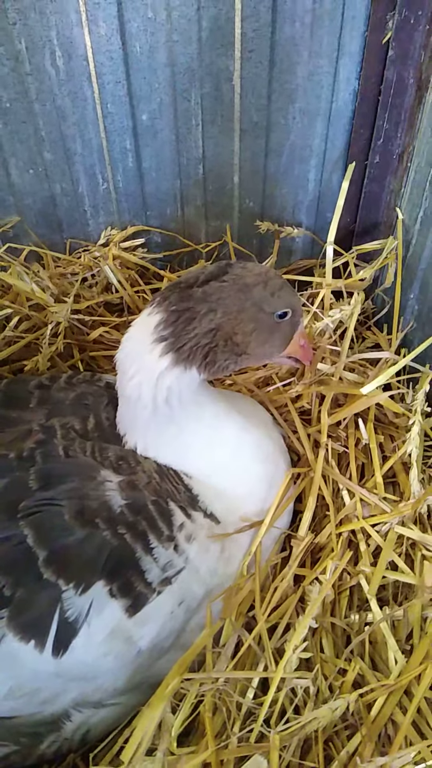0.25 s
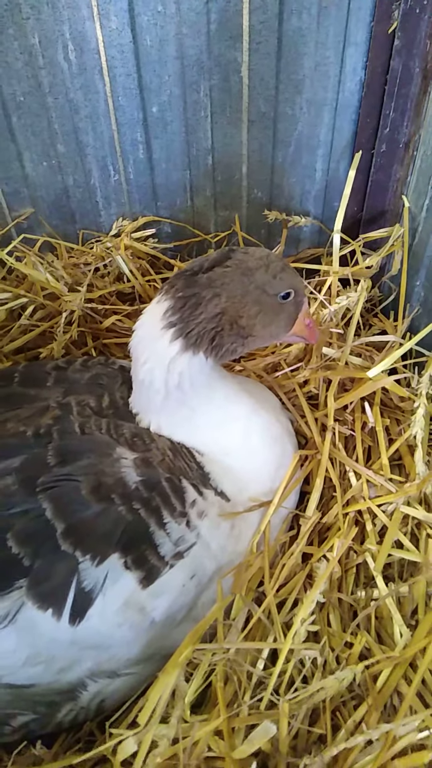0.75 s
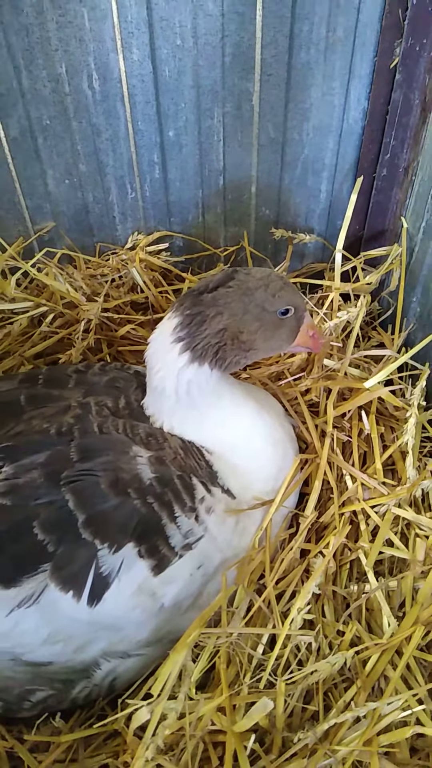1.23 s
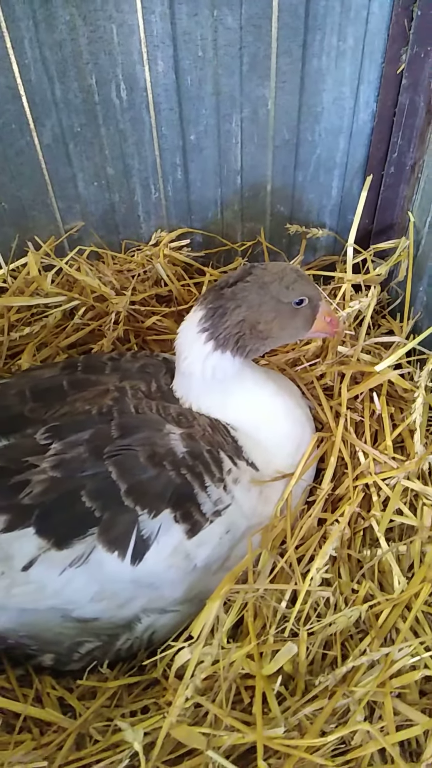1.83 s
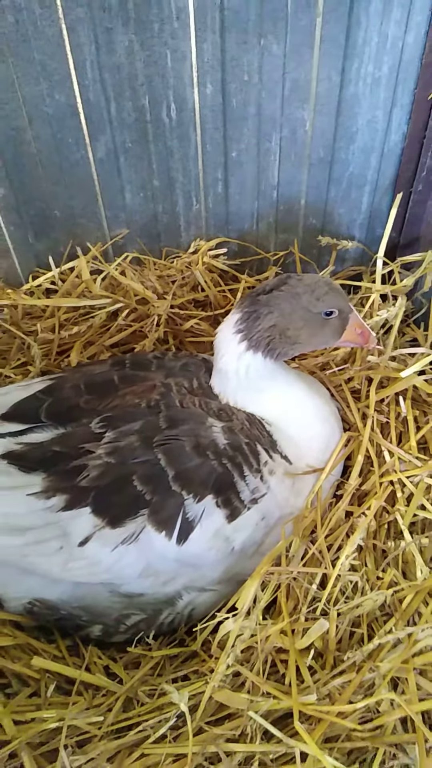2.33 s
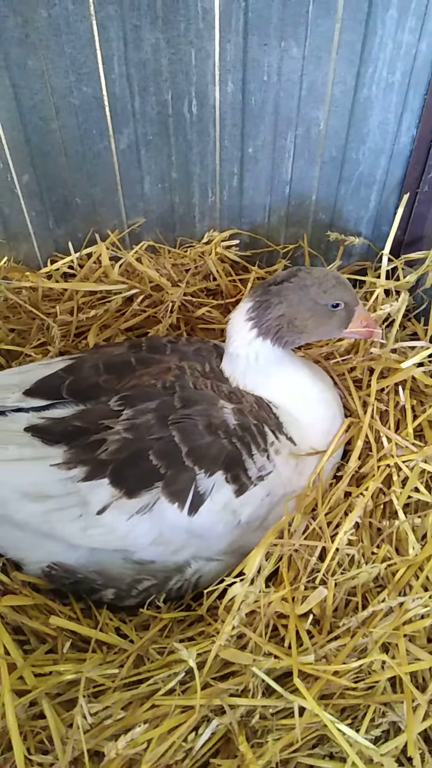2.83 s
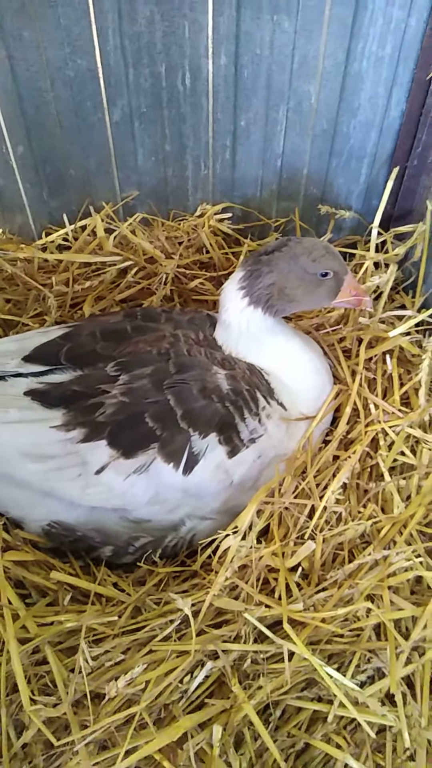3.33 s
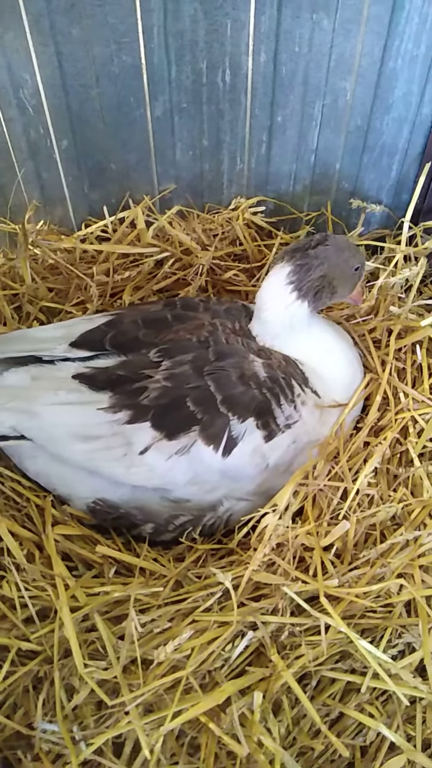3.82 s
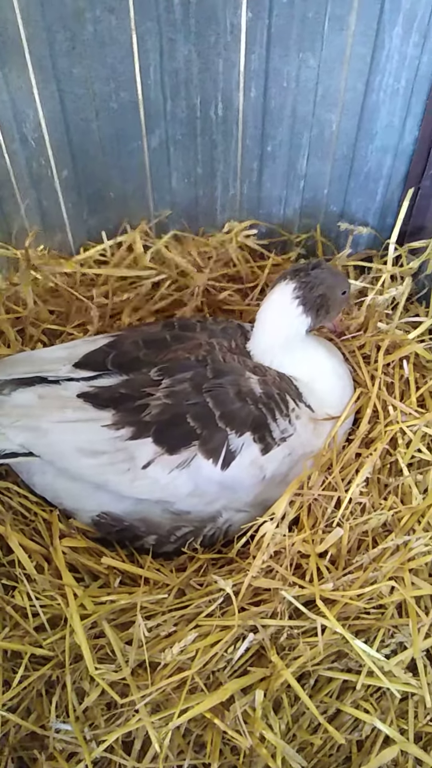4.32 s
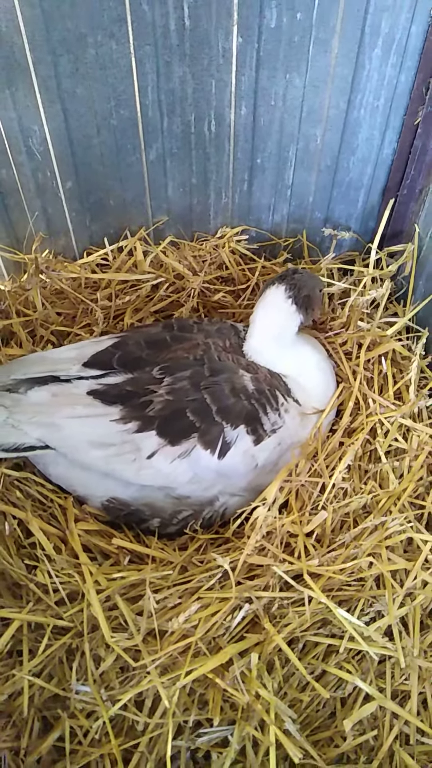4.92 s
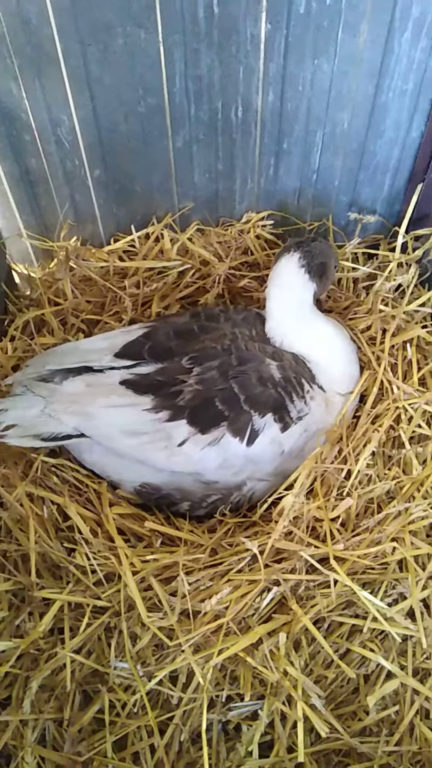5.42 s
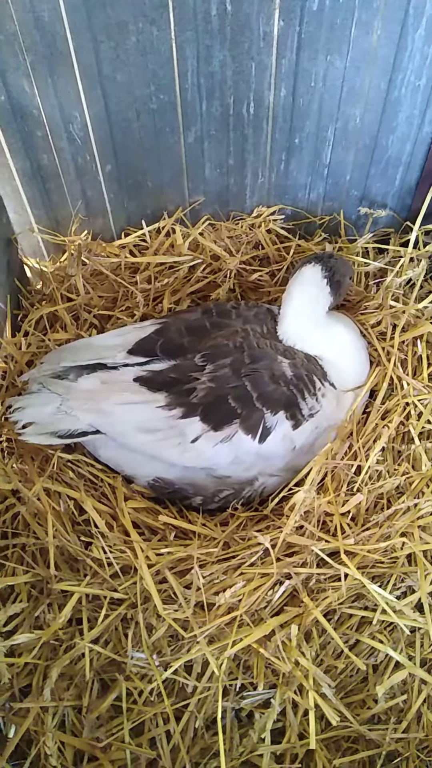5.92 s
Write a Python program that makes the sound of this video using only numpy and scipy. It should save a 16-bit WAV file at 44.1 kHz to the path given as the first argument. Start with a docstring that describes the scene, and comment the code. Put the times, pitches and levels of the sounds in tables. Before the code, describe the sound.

After a brief hoarse crow, quiet clucks and slow steps on straw lead to two breathy goose whistles in a shed.

```python
"""A nesting goose in a metal shed

A goose on a straw nest gives two rising whistles, made in its throat and wrapped in a hiss of air.
A rooster ends a hoarse crow on two coupled membranes, another fowl calls from farther off, hens cluck,
a small bird chirps and something squawks. Straw rustles and snaps, and the floor thuds under slow steps.
The sheet-metal walls reverberate, and the yard returns a long tail of the crow and the far call."""
import sys
import numpy as np
from scipy import signal
from scipy.fft import rfft, irfft, next_fast_len
from scipy.io import wavfile

SR = 44100
rng = np.random.default_rng(int(sys.argv[2]) if len(sys.argv) > 2 else 0)


def waveform_to_disk(signal):
    """Save audio, clipped to [-1, 1], as 16-bit WAV at the path in sys.argv[1]."""
    frames = np.transpose(np.atleast_2d(signal))
    scaled = np.clip(frames, -1, 1) * 32767
    samples = np.round(scaled).astype(np.int16)
    wavfile.write(sys.argv[1], SR, samples)


N = 271634
TIME = np.arange(N) / SR


def amp(db):
    """Amplitude ratio of a level in decibels."""
    return 10 ** (np.asarray(db) / 20)


def unit(x):
    """Normalisation to rms 1."""
    return x / np.sqrt(np.mean(x ** 2) + 1e-20)


def value_at(points, hz):
    """Interpolation on a logarithmic frequency axis."""
    f, value = np.transpose(points)
    return np.interp(np.log(hz + 1), np.log(f + 1), value)


def colour(x, points):
    """Zero-phase filtering by a spectrum in dB, normalised to rms 1."""
    size = x.shape[-1]
    full = next_fast_len(size, True)
    gain = amp(value_at(points, np.fft.rfftfreq(full, 1 / SR)))
    return unit(irfft(rfft(x, full) * gain, full)[..., :size])


def wander(size, rate_hz):
    """Random fluctuation: low-pass noise of rms near 1."""
    full = next_fast_len(size + SR // 2, True)
    f = np.fft.rfftfreq(full, 1 / SR)
    return unit(irfft(rfft(rng.standard_normal(full)) / (1 + (f / rate_hz) ** 4), full))[:size]


def contours(rows):
    """Linear interpolation of breakpoints: the onset, then each column at every sample."""
    times, *columns = np.transpose(rows)
    t = np.arange(max(times[0], 0), times[-1], 1 / SR)
    return [t[0]] + [np.interp(t, times, column) for column in columns]


def phase_of(hz, jitter, rate_hz):
    """Phase as the integral of a randomly modulated frequency."""
    return 2 * np.pi * np.cumsum(hz * (1 + jitter * wander(len(hz), rate_hz))) / SR


def placed(onset, sound):
    """Time shift of a sound to its onset, with tapered ends."""
    faded = sound * signal.windows.tukey(len(sound), .04)
    return np.concatenate([np.zeros(max(round(onset * SR), 0)), faded, np.zeros(N)])[:N]


def pair(a, b, coherence, left_db):
    """Partial coherence: two independent noises mixed into left and right channels."""
    right = coherence * a + np.sqrt(1 - coherence ** 2) * b
    return np.array([a * amp(left_db / 2), right * amp(-left_db / 2)])


def swells(rows, attack_s, arch_db, release_s):
    """Incoherent addition: arched envelopes with exponential release sum in power."""
    power = np.zeros(N)
    for onset, length, db in rows:
        age = TIME - onset
        sag_db = arch_db * (2 * np.clip(age / length, 0, 1) - 1) ** 2
        attack = np.clip(age / attack_s, 0, 1) ** 2
        release = np.exp(-np.maximum(age - length, 0) / release_s)
        power += (amp(db - sag_db) * attack * release) ** 2
    return np.sqrt(power)


# Reverberation time of the shed: f/Hz, T60/s
SHED_T60 = [(150, 0.099), (500, 0.29), (1000, 0.19), (3000, 0.25), (8000, 0.052), (15000, 0.015)]


def shed(x, wet_db, left_db):
    """Reverberation: direct sound plus dense reflections from metal walls, different in each channel."""
    t = np.arange(SR // 2) / SR
    reflections = rng.standard_normal((2, len(t))) * (rng.random((2, len(t))) < .1) * (t > .002)
    hz, age, spectra = signal.stft(reflections, SR, nperseg=256)
    decay = amp(-60 * age / value_at(SHED_T60, hz)[:, None])
    tail = signal.istft(spectra * decay, SR, nperseg=256)[1]
    tail /= np.linalg.norm(tail, axis=1, keepdims=True)
    wet = signal.fftconvolve(x[None], tail, axes=1)[:, :N]
    return (x + amp(wet_db) * wet) / np.hypot(1, amp(wet_db)) * amp([[left_db / 2], [-left_db / 2]])


# Spectrum of the yard's reflections: f/Hz, relative level/dB
YARD_SPECTRUM = [(150, -51), (520, -9), (1050, 2), (1600, 9), (2200, 6.5), (3300, 6.5), (5000, -2),
                 (9000, -33)]


def yard(x, db, t60_s=1.3, build_s=0.095):
    """Late reflection: far walls return a thin tail that builds up, then decays exponentially."""
    t = np.arange(round(1.2 * SR)) / SR
    envelope = amp(-60 * t / t60_s) * np.clip(t / build_s, 0, 1) ** 2
    tail = colour(rng.standard_normal((2, len(t))), YARD_SPECTRUM) * envelope
    return amp(db) * signal.fftconvolve(x[None], tail / np.linalg.norm(tail[0]), axes=1)[:, :N]


# Spectrum of the ambient noise: f/Hz, relative level/dB
AIR_SPECTRUM = [(20, -35), (40, -2.5), (65, 6), (95, 2), (150, -8), (280, -12), (520, -17.5), (880, -11),
                (1300, -29), (2000, -28), (4000, -38.5), (8000, -42.5), (16000, -38)]


def air(level_db=-66.5):
    """Coherence falls with frequency: a rumble alike in both channels under the yard's diffuse wash."""
    common, other = colour(rng.standard_normal((2, N)), AIR_SPECTRUM)
    side = 0.45 * colour(other, [(120, -10.5), (500, -7), (1500, 6)])
    swell = amp(level_db + 1.8 * wander(N, rate_hz=13.0))
    return swell * np.array([common + side, common - side]) * amp([[1.5], [-1.5]])


# Steps and shifts of weight: t/s, duration/s, relative level/dB
FOOTFALLS = [(1.46, 0.074, -62.5), (2.6, 0.14, -57.5), (2.785, 0.058, -51.5), (3.01, 0.14, -54.5),
             (3.29, 0.068, -53), (3.545, 0.11, -50.5), (3.85, 0.19, -61.5)]
# Spectrum of a thud on the floor: f/Hz, relative level/dB
THUD_SPECTRUM = [(20, -50), (35, -33), (60, 4), (110, 0.5), (200, -9.5), (350, -15.5), (800, -14.5),
                 (1400, -20.5), (2500, -23.5), (5000, -38), (12000, -53)]


def steps(gain_db=-2):
    """Soft impact: weight settling on the bedding excites mainly low frequencies."""
    push = swells(FOOTFALLS, attack_s=0.0093, arch_db=1, release_s=0.053) * amp(gain_db)
    return pair(*colour(rng.standard_normal((2, N)), THUD_SPECTRUM), coherence=0.97, left_db=2.5) * push


# Spells of pressing and rubbing on straw: t/s, duration/s, relative level/dB
RUBS = [(0, 0.25, -69.5), (.305, 0.01, -50.5), (.735, 0.059, -71.5), (.95, 0.018, -69), (1.06, .13, -75),
        (1.33, 0.35, -70), (1.47, .05, -67.5), (1.7, .2, -82), (2.025, 0.022, -67), (2.545, 0.35, -69),
        (2.78, 0.079, -64.5), (2.945, 0.052, -65.5), (3.0, 0.19, -66.5), (3.25, 0.15, -67.5),
        (3.51, .21, -65.5), (3.85, 0.05, -69), (3.94, 0.25, -77.5), (4.44, 0.089, -74), (4.52, 0.065, -68),
        (4.61, 0.13, -66.5), (4.735, 0.088, -59.5), (4.822, 0.035, -58), (4.875, 0.052, -56),
        (4.93, 0.093, -67.5), (5.04, 0.6, -68), (5.62, .04, -71.5), (6.12, 0.068, -64.5)]
# Bright fizz of the straw: f/Hz, relative density level/dB
FIZZ_SPECTRUM = [(20, -23), (800, -23), (2000, -14.5), (3500, -12), (5500, -4.5), (8000, -5.5), (11000, 1),
                 (14000, 2), (16000, -1.5)]
# Body of the sound, from stalks bending and rubbing: f/Hz, relative density level/dB
STALK_SPECTRUM = [(20, -27), (100, 0.5), (250, 7), (500, 0), (1000, -1.5), (1500, -9.5), (2500, -10.5),
                  (4000, -10.5), (8000, -25.5), (16000, -24)]


def straw(fizz_db=-1.5, rest_db=-83, body_db=-75.5, body_slope=0.48,
          grains_per_s=900, cracks_per_s=110, crack_s=0.0032):
    """Friction noise: countless stalks rub and crackle; harder rubbing adds more fizz than body."""
    rub = np.hypot(swells(RUBS, attack_s=0.0084, arch_db=5, release_s=0.023), amp(rest_db))
    cracks = 0.48 * rng.random(N) * (rng.random(N) < cracks_per_s / SR)
    crackle = signal.lfilter([1], [1, -np.exp(-1 / (crack_s * SR))], cracks)
    rub_db = 20 * np.log10(rub * (1 + crackle)) + 2.47 * wander(N, rate_hz=24)
    grains = rng.standard_normal((2, N)) * (rng.random((2, N)) < grains_per_s / SR)
    drive = rng.standard_normal((2, N)) + 0.71 * unit(grains)
    fizz = pair(*colour(drive, FIZZ_SPECTRUM), coherence=0.072, left_db=4.5)
    body = pair(*colour(drive, STALK_SPECTRUM), coherence=0.38, left_db=1)
    return fizz * amp(rub_db + fizz_db) + body * amp(body_db + body_slope * (rub_db - np.median(rub_db)))


# Breaking stalks: t/s, relative peak level/dB
STALK_BREAKS = [(0.3916, -70), (0.5671, -70), (1.1448, -62), (1.8257, -64.5), (2.198, -62), (2.4663, -69),
                (3.131, -58), (3.8846, -61), (4.0025, -56), (4.843, -48), (4.9485, -50.5), (5.3065, -35.5),
                (5.4304, -38.5), (5.9893, -37)]
# Spectrum of a snap: f/Hz, relative density level/dB
SNAP_SPECTRUM = [(100, 15), (1000, -15), (3500, -33), (6000, 6.5), (8500, -1), (11500, 11), (16000, 10)]


def snaps(gain_db=-2, decay_s=0.0097):
    """Fracture transients: a stalk gives way in a bright burst that decays exponentially."""
    bursts = np.zeros(N)
    for onset, db in STALK_BREAKS:
        age = TIME - onset
        bursts += amp(db + gain_db) * np.exp(-abs(age) / decay_s) * (age > 0)
    return pair(*colour(rng.standard_normal((2, N)), SNAP_SPECTRUM), coherence=0.24, left_db=0.5) * bursts


# Chirps of the small bird: t/s, duration/s, top f/Hz, level/dB
BIRD_CHIRPS = [(0.203, .045, 5090, -64.5), (2.789, .05, 5350, -72), (3.018, .125, 4765, -62.5)]


def small_bird(octave_db=-14, bend_hz_per_s=4500, skew=0.71, flutter_db=4):
    """Frequency modulation: each fluttering chirp arches in pitch, a longer one bending further."""
    out = np.zeros(N)
    for onset, length, top_hz, db in BIRD_CHIRPS:
        progress = np.linspace(0, 1, round(length * SR))
        hz = top_hz - bend_hz_per_s * length * (1 - np.sin(np.pi * progress ** skew))
        phase = phase_of(hz, jitter=0.015, rate_hz=130)
        envelope = amp(db + flutter_db * wander(len(hz), rate_hz=39)) * np.sin(np.pi * progress)
        out += placed(onset, envelope * unit(np.sin(phase) + amp(octave_db) * np.sin(2 * phase)))
    return shed(out, wet_db=-1.5, left_db=6)


# Course of the squawk: t/s, f/Hz, level/dB
SQUAWK_CONTOUR = [(4.38, 668, -74), (4.395, 709, -68), (4.42, 720, -86), (4.45, 673, -87)]
# Throat response for the squawk: f/Hz, relative level/dB
SQUAWK_FORMANTS = [(700, -2), (1400, -8), (2100, 5), (2800, -23), (3500, 0.5), (4250, -9), (5300, -10),
                   (7000, -12)]


def squawk():
    """Source and filter: throat resonances shape a harmonic series into one short, reedy note."""
    onset, hz, db = contours(SQUAWK_CONTOUR)
    phase = phase_of(hz, jitter=0.033, rate_hz=510)
    reed = unit(sum(amp(value_at(SQUAWK_FORMANTS, k * hz)) * np.cos(k * phase) for k in range(1, 10)))
    return shed(placed(onset, amp(db) * reed), wet_db=10, left_db=5.5)


# Soft clucks: t/s, duration/s, top f/Hz, level/dB, second harmonic re first/dB
HEN_CLUCKS = [(0.603, 0.047, 634, -56.5, -31), (0.892, 0.027, 615, -59.5, -19),
              (1.151, 0.03, 584, -64.5, -15), (1.348, .095, 427.7, -65.5, 29),
              (1.509, 0.026, 444, -68.5, -3), (1.606, 0.099, 388, -68.5, 20),
              (1.787, 0.074, 442.6, -67.5, -2), (2.067, 0.061, 410, -59.5, -9), (2.22, 0.095, 424, -68, 12),
              (2.452, 0.1, 435, -65.5, 16), (2.651, 0.23, 467.5, -60.5, 6), (3.127, 0.056, 549, -67, -24),
              (3.19, 0.11, 422.6, -64.5, 8.5), (3.374, 0.052, 575, -63, -17), (3.438, 0.11, 426, -65.5, 11),
              (4.417, .06, 471, -64.5, -12), (4.552, 0.12, 476.5, -65, -23), (4.729, 0.067, 426.3, -61, -5),
              (4.869, 0.13, 418, -64, -10), (5.406, 0.09, 452.3, -58, 13), (5.634, 0.079, 430.4, -68.5, 4),
              (5.888, 0.046, 432.3, -64.5, 10), (6.1, 0.035, 442, -61.5, 8.5)]
# Breath noise of a cluck: f/Hz, relative level/dB
HUSK_SPECTRUM = [(200, -26), (420, -6.5), (560, -5.5), (720, 4), (900, -1.5), (1150, -17), (1900, -8),
                 (2500, -9.5), (3200, -36), (8000, -46)]


def hens(third_db=-19, pitch_arch=0.0487, husk_db=-7, husk_slope=0.42, skew=0.72):
    """Joint modulation: pitch and loudness rise and fall with effort; brighter notes are huskier."""
    out = np.zeros(N)
    for onset, length, hz, db, second_db in HEN_CLUCKS:
        progress = np.linspace(0, 1, round(length * SR))
        effort = np.sin(np.pi * progress ** skew).clip(0)
        phase = phase_of(hz * (1 - pitch_arch * (1 - effort)), jitter=.04, rate_hz=110)
        overtones = np.sin(2 * phase) + amp(third_db) * np.sin(3 * phase)
        note = unit(np.sin(phase) + amp(second_db) * overtones)
        breath = rng.standard_normal(len(phase)) * (1 + np.sin(phase))
        husk = amp(husk_db + husk_slope * min(second_db, 0)) * colour(breath, HUSK_SPECTRUM)
        out += placed(onset, amp(db) * (note + husk) * np.sqrt(effort))
    return shed(out, wet_db=-4, left_db=2.5)


# Course of the far call: t/s, f/Hz, relative level/dB, spectral tilt/(dB per octave)
FAR_CONTOUR = [(3.62, 560.7, -61, -12), (3.69, 596, -53.5, -5), (3.77, 622.6, -57, -1.5),
               (3.84, 608.6, -52, 0), (3.94, 547.4, -55.5, 4.5), (4.05, 531, -57.5, 2),
               (4.11, 523, -66, -4)]
# Throat response of the far fowl: f/Hz, relative level/dB
FAR_FORMANTS = [(200, -43), (420, -3.5), (560, 7), (750, -12), (1100, 0.5), (1350, -19), (1600, -5),
                (2100, -7), (2700, -21.5), (3800, -21), (4800, -26), (6500, -30), (10000, -30.5),
                (16000, -58)]
# Resonances of the far coop: f/Hz, nominal bandwidth/Hz, relative level/dB
COOP_MODES = [(745.4, 17, -11.5), (976, 84, -13.5), (1130, 160, -10.5), (1554, 26, -12.5), (1784, 85, -20),
              (2010, 62, -20.5), (2671, 37, -20.5), (3030, 50, -31), (4740, 35, -32)]


def far_fowl(tone_db=-5, rasp_db=-10, rings_db=-1):
    """Forced resonance: a hoarse, falling call brightens as the beak opens; its rasp rings the coop."""
    onset, hz, level_db, tilt_db = contours(FAR_CONTOUR)
    phase = phase_of(hz, jitter=.013, rate_hz=100)
    gains = np.array([amp(value_at(FAR_FORMANTS, k * hz) + tilt_db * np.log2(k)) for k in range(1, 19)])
    gains /= np.linalg.norm(gains, axis=0)
    tone = sum(gain * np.cos(k * phase) for k, gain in enumerate(gains, 1))
    rasp = colour(rng.standard_normal(len(hz)), FAR_FORMANTS)
    voice = amp(tone_db) * unit(tone) + amp(tilt_db / 2 + rasp_db) * rasp
    for mode_hz, width_hz, db in COOP_MODES:
        resonator = signal.iirpeak(mode_hz, mode_hz / width_hz / 2, fs=SR)
        ring = unit(signal.lfilter(*resonator, signal.lfilter(*resonator, rasp)))
        voice += ring * amp(db + rings_db + tilt_db * np.log2(mode_hz / hz))
    call = placed(onset, amp(level_db) * voice)
    return shed(call, wet_db=-2.0, left_db=2.5) + yard(call, db=-16.5)


# End of the crow: t/s, voice f/Hz, relative voice level/dB, growl f/Hz, growl level/dB
CROW_CONTOUR = [(0, 550.4, -38.5, 192, -35.5), (.03, 531.4, -42, 200.7, -59), (.07, 566.4, -41.5, 199, -40),
                (.11, 565.2, -45, 180.6, -65), (.138, 572.5, -40.5, 191, -40.5), (.2, 558, -40, 180, -45),
                (.24, 545.8, -39, 183.5, -38), (.285, 512, -44.5, 133.5, -44), (.34, 498.4, -74, 156, -63)]
# Response of the rooster's throat to the harmonics: f/Hz, relative level/dB
CROW_FORMANTS = [(560, 4.5), (1120, -1.5), (1690, -18), (2250, -16.5), (2800, -25.5), (3350, -26),
                 (4000, -36), (4600, -31), (5100, -29), (6200, -32), (8000, -56)]
# Its response to the rasp: f/Hz, relative level/dB
RASP_SPECTRUM = [(100, -2.5), (400, -10), (660, 2.5), (950, -2.5), (1220, 0.5), (1500, -17.5), (1850, -5),
                 (2650, -20.5), (3600, -25.5), (4300, -38), (5100, -28), (6300, -30), (7500, -38),
                 (16000, -40)]


def rooster(tone_db=3, rasp_db=-5, rasp_rise_db_per_s=16, carry_s=0.26):
    """Amplitude modulation: a slow membrane growls and shakes a fast one, which chops air into a rasp."""
    onset, hz, level_db, slow_hz, growl_db = contours(CROW_CONTOUR)
    tiring_db = rasp_rise_db_per_s * np.arange(len(hz)) / SR  # the rasp grows as the crow tires
    phase = phase_of(hz, jitter=.006, rate_hz=90)
    # Dispersion: the throat spreads each pulse in time, hence the phase offsets k * k.
    tone = sum(amp(value_at(CROW_FORMANTS, k * hz)) * np.cos(k * phase + k * k) for k in range(1, 14))
    slow_membrane = np.cos(phase_of(slow_hz, jitter=.08, rate_hz=90))
    shake = placed(onset, slow_membrane)
    rasp = colour(rng.standard_normal(len(hz)) * (1 + np.cos(phase)), RASP_SPECTRUM)
    voice = placed(onset, amp(level_db + tone_db) * unit(tone)) * (1 + 0.07 * shake)
    hoarse = placed(onset, amp(level_db + rasp_db + tiring_db) * rasp) * (1 + 0.06 * shake)
    growl = placed(onset, amp(growl_db) * unit(slow_membrane))
    # The falling end carries farthest.
    carried = voice * amp(np.interp(TIME, [carry_s - .03, carry_s + 0.037], [-15, 4]))
    near = shed(voice + growl, wet_db=-17, left_db=4)
    return near + shed(hoarse, wet_db=-6.5, left_db=0.5) + yard(carried, db=-9.5)


# Whistles: t/s, duration/s, relative tone level/dB, tilt/(dB per harmonic), hiss level/dB
GOOSE_CALLS = [(5.239, 0.28, -44.5, -6, -51.5), (5.793, 0.27, -48, -1, -50.5)]
# Response of the goose's throat: f/Hz, relative level/dB
GOOSE_FORMANTS = [(1100, -7), (1780, -9), (1860, -1), (2400, -1.5), (3590, -7.5), (3730, 3), (4200, 5.5),
                  (5100, -1.5), (5480, 5.5), (5640, -3.5), (6850, 2), (7200, -14), (7480, -36),
                  (11000, -18), (13000, -18)]


def goose_whistle(start_hz=1095, knee_hz=1712, top_hz=1861, knee_s=0.057, top_s=.168,
                  attack_s=0.079, swell_db=16.5, fade_from_s=0.17, fade_db_per_s=247, wheeze=0.183):
    """Flow-driven oscillation in the throat: jitter smears the tone as it leaps; it clears at the top."""
    out = np.zeros(N)
    for onset, length, db, tilt_db, _ in GOOSE_CALLS:
        t = np.arange(0, length, 1 / SR)
        hz = np.interp(t, [0, knee_s, top_s], [start_hz, knee_hz, top_hz])
        jitter = .007 + wheeze * np.clip(1 - hz / knee_hz, 0, 1)
        phase = phase_of(hz, jitter, rate_hz=284)
        tone = sum(amp(value_at(GOOSE_FORMANTS, k * hz) + tilt_db * (k - 1)) * np.sin(k * phase)
                   for k in range(1, 8))
        rise_db = swell_db * np.minimum(t / attack_s - 1, 0)
        fade_db = fade_db_per_s * np.maximum(t - fade_from_s, 0)
        flutter_db = 2.5 * wander(len(t), rate_hz=116)
        out += placed(onset, np.sqrt(2) * amp(db + rise_db - fade_db + flutter_db) * tone)
    return shed(out, wet_db=-11, left_db=3)


# Air rushing out with a whistle: f/Hz, relative density level/dB
HISS_SPECTRUM = [(30, -12), (250, -2.5), (1000, -0.5), (1600, -10.5), (4000, -8.5), (8000, -7.5),
                 (11000, -1), (16000, 0.5)]


def goose_hiss(lead_s=0.039, stretch=1.096, flutter_db=1.5):
    """Flow noise: air starts to hiss just before each whistle and flows all through it."""
    breaths = [(onset - lead_s, stretch * length, db) for onset, length, _, _, db in GOOSE_CALLS]
    flow = swells(breaths, attack_s=0.079, arch_db=5, release_s=0.017)
    hiss = pair(*colour(rng.standard_normal((2, N)), HISS_SPECTRUM), coherence=0.25, left_db=4.0)
    return hiss * flow * amp(flutter_db * wander(N, rate_hz=60))


def scene():
    """Superposition of the birds, the straw, the steps and the ambient noise."""
    birds = rooster() + far_fowl() + squawk() + hens() + small_bird() + goose_whistle() + goose_hiss()
    return birds + straw() + snaps() + steps() + air()


# Lag of the right microphone port behind the left: f/Hz, phase/rad
PORT_LAG = [(50, 0.01), (180, 0.18), (550, 0.22), (1100, 1.65), (2000, 1.75), (4000, 1.6), (8000, 1.6),
            (16000, 0.12)]


def record(dry, bass_cut_hz=45, band_limit_hz=15850):
    """Phase lag and band limiting: sound reaches the left port first, and both ports are filtered."""
    lag = value_at(PORT_LAG, np.fft.rfftfreq(N, 1 / SR))
    right = irfft(rfft(dry[1]) * np.exp(-1j * lag), N)
    high_pass = signal.butter(3, bass_cut_hz, "high", fs=SR, output="sos")
    low_pass = signal.firwin(511, band_limit_hz, window=("kaiser", 9), fs=SR)
    ports = signal.sosfilt(high_pass, [dry[0], right])
    return signal.oaconvolve(ports, low_pass[None], "same")


dry = scene()
out = record(dry)
waveform_to_disk(out)
```